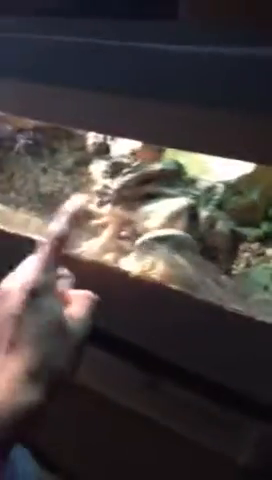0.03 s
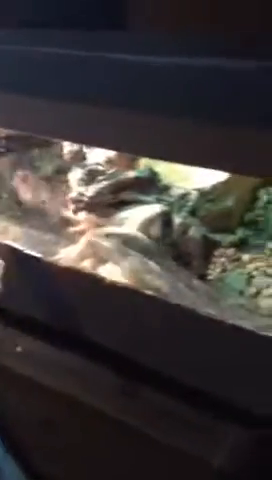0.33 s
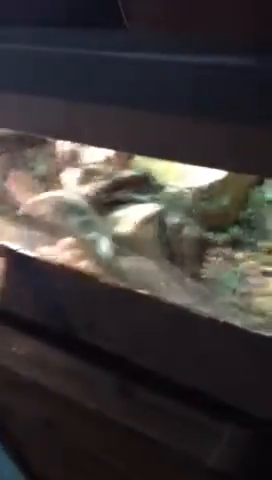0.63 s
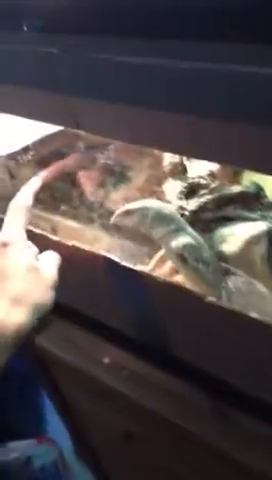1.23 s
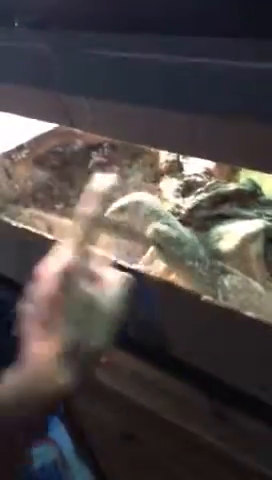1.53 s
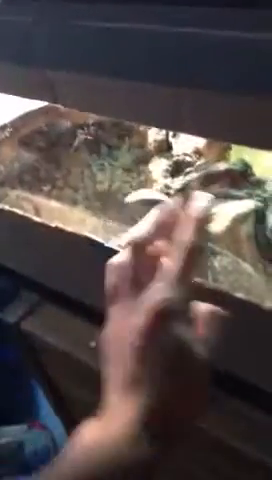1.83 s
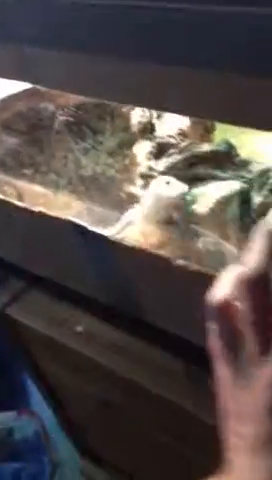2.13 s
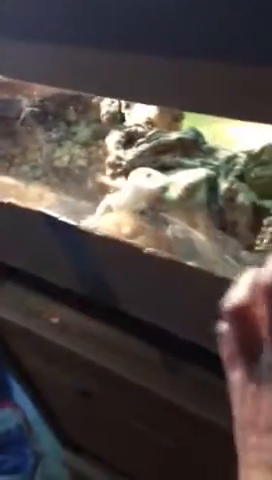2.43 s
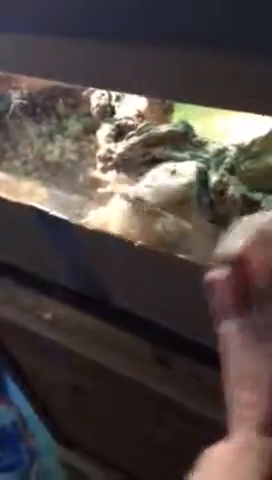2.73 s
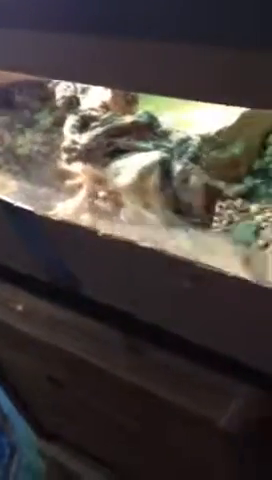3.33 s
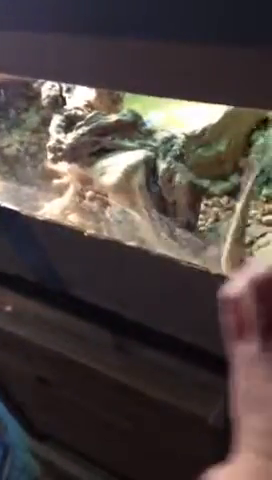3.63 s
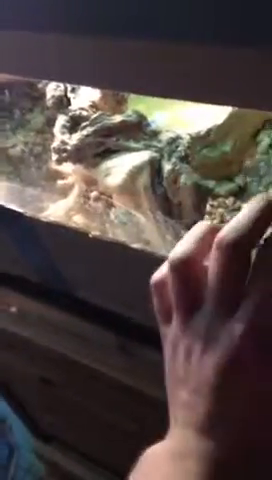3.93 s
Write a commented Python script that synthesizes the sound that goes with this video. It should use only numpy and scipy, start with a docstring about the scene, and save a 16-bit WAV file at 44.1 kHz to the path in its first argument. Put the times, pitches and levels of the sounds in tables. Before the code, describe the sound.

Taps and scratches on a lizard's glass tank, heard close in a quiet room. A fingernail clicks and the wooden cabinet bumps softly, claws scuff and squeak, then after a lull comes a quick flurry that thins out.

```python
"""A lizard's glass tank in a quiet room, one microphone close to the front pane.
Over faint hiss and hum, a first tap clicks on the glass and soft bumps make the wooden cabinet boom.
Fingernail and claws tick and scuff along the pane, squeaking where they stick and slip, with one
sharp tap at 1.6 s. After a lull, a flurry of taps, scratches and bumps starts near 3 s, is loudest
at 3.4 s and thins out to a last small tick."""
import sys
import numpy as np
from scipy import signal
from scipy.fft import rfft, irfft, next_fast_len
from scipy.io import wavfile
from scipy.ndimage import map_coordinates

SR = 44100
rng = np.random.default_rng(int(sys.argv[2]) if len(sys.argv) > 2 else 0)


def generate_wav(signal):
    """Clip the signal to [-1, 1] and save it as 16-bit WAV at the path in sys.argv[1]."""
    frames = np.transpose(np.atleast_2d(signal))
    scaled = np.clip(frames, -1, 1) * 32767
    pcm = np.round(scaled).astype(np.int16)
    wavfile.write(sys.argv[1], SR, pcm)


N = 4 * SR

# decay of the small room: frequency_hz, t60_s
ROOM_DECAY = [(150, 0.57), (1000, 0.25), (3500, 0.17), (8000, 0.25), (15000, 0.092)]
# spectrum of the room tone and hiss: frequency_hz, gain_db
ROOM_TONE_COLOUR = [(25, -22), (55, -23), (85, -21), (107, -9.5), (147, -3), (176, 1), (209, -7),
                    (245, -2.5), (310, -12.5), (440, -12), (760, -16), (1300, -19), (2300, -20.5),
                    (4500, -18.5), (5500, -21), (8400, -21), (10000, -29), (12000, -21.5), (15000, -21.5)]
# course of a soft rustle of movement: time_s, level_db
RUSTLE_LEVELS = [(0, -80), (.3, -70), (.55, -79.5), (.95, -72.5), (1.5, -77.5), (2.9, -75.5), (3.2, -65.5),
                 (3.45, -65), (3.6, -62.5), (3.8, -68), (4, -73.5)]
# spectrum of that rustle: frequency_hz, gain_db
RUSTLE_COLOUR = [(60, -42), (170, -2), (310, -2), (430, -1), (640, -4), (800, -6.5), (2000, -7.5),
                 (5000, -15.5), (12000, -21.5)]
# soft bumps on the cabinet: start_s, relative_level_db, pitch_hz
CABINET_BUMPS = [(0.127, -49, 235), (0.148, -46, 170), (0.194, -51.5, 176.5), (0.236, -51.5, 160),
                 (.29, -65.5, 190), (0.357, -58, 185.4), (0.618, -61, 165), (.935, -59.5, 228),
                 (1.352, -63, 194), (1.655, -54, 181.6), (1.848, -64.5, 162), (1.971, -61.5, 175),
                 (2.535, -59.5, 265), (2.543, -53.5, 158.4), (2.774, -58, 164), (2.812, -66, 158),
                 (3.039, -56, 149), (3.199, -54.5, 163), (3.305, -51.5, 165), (3.343, -53, 164),
                 (3.377, -44.5, 162), (3.41, -45.5, 162), (3.461, -51, 150.8), (3.588, -54, 157.6),
                 (3.643, -43, 161.5), (3.734, -66, 162), (3.849, -61, 165)]
# modes of the wooden cabinet: multiple_of_bump_pitch, gain_db, t60_s
CABINET_MODES = [(.8, -4.5, 0.035), (1, 6.5, 0.085), (1.45, -4.5, 0.083), (2.4, -22, 0.078)]
# dry scuffs of claws along the pane: start_s, length_s, level_db, treble_db
CLAW_SCUFFS = [(0.613, 0.039, -61, 0.5), (0.677, 0.088, -68.5, 10), (0.857, 0.043, -61.5, -6.5),
               (1.041, 0.03, -61, -0.5), (1.078, 0.063, -69, -6), (1.166, .045, -62, -10.5),
               (1.238, 0.044, -63, -10), (1.323, 0.034, -67.5, -4), (1.39, 0.042, -64, -9),
               (1.504, 0.032, -62, -1), (1.54, 0.026, -66.5, -6), (1.775, 0.037, -66.5, 10),
               (1.816, 0.021, -58, 0), (1.849, 0.025, -49, 4), (1.961, 0.014, -67, -17),
               (2.936, 0.023, -64.5, -6), (2.992, 0.11, -58.5, 8), (3.082, 0.076, -51.5, 12.5),
               (3.229, 0.18, -60, 11), (3.331, 0.033, -53.5, 15), (3.383, 0.03, -52.5, 3),
               (3.453, 0.049, -53, 6), (3.515, 0.13, -66.5, 13)]
# spectrum of a scuff: frequency_hz, gain_db
SCUFF_COLOUR = [(300, -44), (2050, -20), (2450, -12.5), (3100, -2.5), (3900, -8.5), (4500, -2.5),
                (5100, -14.5), (6800, -9.5), (8600, -13), (9800, -17.5), (15000, -27)]
# stick-slip squeaks: start_s, length_s, first_pitch_hz, last_pitch_hz, level_db, roughness_share
CLAW_SQUEAKS = [(.584, 0.0097, 6280, 5850, -51.5, 0.025), (0.585, 0.022, 7200, 6320, -56, 0.103),
                (0.616, 0.034, 2670, 2440, -56, 0.038), (0.661, 0.045, 2800, 3690, -57.5, 0.1),
                (0.693, 0.053, 3390, 3135, -57, 0.075), (1.849, 0.013, 5030, 4200, -50.5, 0.032),
                (1.856, 0.014, 3056, 2970, -52, 0.041), (1.928, 0.011, 2580, 2740, -55.5, 0.056),
                (2.162, 0.014, 6350, 7000, -66, 0.056), (2.969, 0.0083, 7180, 7000, -48, 0.017),
                (2.978, 0.0045, 7940, 8900, -45.5, 0.017), (2.99, 0.0098, 8750, 8660, -35.5, 0.0027),
                (3.012, 0.031, 10200, 10200, -55, 0.03), (3.031, 0.026, 10120, 8680, -47, 0.068),
                (3.08, 0.014, 14000, 11700, -51, 0.069), (3.088, 0.029, 8030, 4100, -43.5, 0.042),
                (3.118, 0.0165, 3820, 4350, -44, 0.045), (3.27, 0.014, 12700, 10800, -55.5, 0.05),
                (3.281, 0.0066, 8250, 7840, -52.5, .04), (3.307, 0.0053, 10060, 9700, -49.5, 0.026),
                (3.32, 0.011, 8660, 6460, -53, 0.065), (3.339, 0.026, 8960, 8200, -45, 0.04),
                (3.355, 0.02, 10300, 8800, -52, 0.08), (3.393, 0.0063, 5900, 5560, -42.5, 0.016),
                (3.606, 0.007, 10270, 10900, -51, 0.015)]
# hard contacts with the pane:
# start_s, relative_level_db, bass_db, mid_db, treble_db, chatter_t60_s, resonance_hz
PANE_TAPS = [(0.1256, -36.5, 10, 1, -1.5, .014, 2500), (0.2247, -62, -12, -4, 13.5, 0.015, 4680),
             (0.235, -62.5, 25, 7, 15, 0.024, 3300), (.301, -65, 11, 11, 6, 0.03, 3000),
             (0.717, -49.5, 13.5, -3, 0, 0.0083, 3030), (.931, -67, 24, 12, -4, 0.01, 500),
             (1.096, -52.5, -1, -11, -5, 0.0099, 3050), (1.117, -55.5, 12.5, -3, -8, 0.026, 3020),
             (1.511, -55.5, -13, -10, -3, 0.022, 4550), (1.6424, -30.5, -19.5, -8.5, -5, 0.033, 2650),
             (1.651, -46.5, 4, 11, 7, 0.039, 2560), (2.104, -61, 8, -4, 7.5, 0.023, 3000),
             (2.151, -60, 0, -8, 3, 0.022, 3900), (2.743, -55.5, 4, -8, 2.5, 0.016, 4500),
             (2.971, -42.5, -12, -13, 4, 0.02, 4450), (3.0245, -49, -22, -6, 4.5, 0.021, 3200),
             (3.2, -28.5, -12, 5, -14, 0.016, 2950), (3.2058, -39, -1, 2, -30, 0.044, 1440),
             (3.232, -58, -8, -6, 14, 0.033, 7800), (3.25, -52, -10, -12, 7, 0.03, 4500),
             (3.3389, -29.5, 1, 7, -20, 0.012, 1470), (3.367, -42, 9.5, 17, -10, 0.06, 1490),
             (3.3741, -46, -2, -6, 7, 0.0094, 3040), (3.382, -33.5, 11, 3.5, -6, 0.023, 4250),
             (3.388, -41, -11, 13, 16, 0.025, 7850), (3.409, -25.5, 0, 5, 6.5, 0.026, 3000),
             (3.4122, -28.5, 1.5, 4, 0, 0.012, 1017), (3.429, -51, -12, 4, 0, 0.045, 4300),
             (3.441, -46, 2, -3, -9, .02, 3130), (3.473, -63, -2, 13, 17, 0.028, 4000),
             (3.491, -53, -5, -7, 15, .025, 4500), (3.539, -60.5, 6, -6, 16.5, 0.03, 4600),
             (3.639, -48.5, -4, -21, -5, 0.059, 4530), (3.917, -59.5, 3, 8, -15, 0.013, 2400)]
# spectrum of a tap's click: frequency_hz, gain_db
CLICK_COLOUR = [(70, -47), (170, -12.5), (310, -19.5), (420, -3), (630, -10.5), (800, -8), (1000, -8),
                (1300, -6), (1800, -4), (2150, -6), (2500, 1), (2900, 0.5), (4500, -2), (5100, -11.5),
                (8000, -11), (11000, -20.5), (15000, -26)]
# modes of the glass pane: frequency_hz, gain_db, t60_s
PANE_MODES = [(754, -13, .22), (792, -12, .22), (1010, -8, .15), (1240, -12, .16), (1410, -11, .13),
              (1520, -9, .1), (2010, -9, .08), (2367, -4, .1), (2720, 0, .08), (2927, 3, .1), (3130, 0, .1),
              (3280, -1, .07), (3742, -3, .08), (4560, -2, .11)]

ROOM_TONE_DB, HUM_DB, RUSTLE_SWING_DB = -68.5, -78.5, 2.5
BOOM_HZ, BOOM_DB, BOOM_T60_S = 171, -20, 0.35  # the room's low resonance, woken by every bump
BUMP_ROOM_DB, SLIP_ROOM_DB, TAP_ROOM_DB = -11.5, -7, -7  # reverberation against direct sound
BUMP_GAIN_DB, BUMP_RISE_S = 26, 0.01
GRAINS_PER_S = 3500
JITTER_PER_S, GRIP_PER_S, GRIP_DB_PER_ROUGHNESS = 1000, 900, 60
OVERTONE_DB, SKID_PER_ROUGHNESS, SKID_HALF_WIDTH_HZ = -9.5, 11.25, 489
TAP_GAIN_DB, CONTACT_S = 19, 0.0019
SNAP_DB, SNAP_T60_S = -6, 0.019  # the snap's gain at this chatter t60; longer chatter softens it
SPOT_DB, SPOT_WIDTH = 8, 0.03  # each spot favours one resonance: boost, width as a share of its pitch
RING_DB, FULL_RING_DB, MODE_SCATTER_DB = -7, -26, 4  # blows below FULL_RING_DB ring the pane less
BASS_HZ, MID_HZ, TREBLE_HZ, TOP_HZ = 700, 2300, 4900, 15500


def amp(db):
    """Decibels to gain."""
    return 10 ** (np.asarray(db) / 20)


def unit_rms(x):
    """Scaled to rms 1."""
    return x / np.sqrt(np.mean(x ** 2) + 1e-20)


def unit_energy(x):
    """Scaled to energy 1."""
    return x / np.sqrt(np.sum(x ** 2) + 1e-20)


def along(points, hz):
    """Reads (frequency_hz, value) points on a log frequency axis."""
    freqs, values = np.transpose(points)
    return np.interp(np.log(hz + 1), np.log(freqs + 1), values)


def wobble(per_s, size):
    """A smooth random curve with per_s knots a second."""
    return map_coordinates(rng.standard_normal(size + 4), [np.arange(size) * per_s / SR])


def add(track, start_s, x):
    """Mixes x in from start_s."""
    i = round(start_s * SR)
    track[i:i + len(x)] += x[:max(len(track) - i, 0)]


def coloured(x, gain_db):
    """x through a minimum-phase filter; gain_db is a function of Hz."""
    size = 2 * next_fast_len(len(x))
    cepstrum = irfft(np.log(amp(gain_db(np.fft.rfftfreq(size, 1 / SR)))), size)
    cepstrum[1:size // 2] *= 2
    cepstrum[size // 2 + 1:] = 0
    return irfft(rfft(x, size) * np.exp(rfft(cepstrum)), size)[:len(x)]


def shelves(x, bass_db, mid_db, treble_db):
    """Three tone bands, each with its own gain: bass, mid and treble."""
    def gain_db(f):
        bass, bass_and_mid, under_treble = (1 / (1 + (f / hz) ** 6) for hz in (BASS_HZ, MID_HZ, TREBLE_HZ))
        return bass_db * bass + mid_db * (bass_and_mid - bass) + treble_db * (1 - under_treble)
    return coloured(x, gain_db)


def stroke(t, length, rise, fall):
    """Envelope of a claw stroke; rise and fall are shares of the length."""
    return np.clip(t / (rise * length), 0, 1) * np.clip((1 + fall / 2 - t / length) / fall, 0, 1)


def in_room(x, wet_db):
    """The direct sound plus the tail of a small room whose bass lingers longest."""
    hz, t, spectra = signal.stft(rng.standard_normal(SR // 2), SR, nperseg=256)
    tail = signal.istft(spectra * amp(-60 * t / along(ROOM_DECAY, hz)[:, None]), SR, nperseg=256)[1]
    build_up = np.minimum(np.arange(len(tail)) / SR / 0.0047, 1)
    response = amp(wet_db) * unit_energy(tail * build_up)
    response[0] += 1
    return signal.fftconvolve(x, response)


def background():
    """Room tone, hiss, a faint wavering hum and a soft rustle of movement."""
    t = np.arange(N) / SR
    air = unit_rms(coloured(rng.standard_normal(N), lambda f: along(ROOM_TONE_COLOUR, f)))
    hum = unit_rms(np.sin(2 * np.pi * BOOM_HZ * t + wobble(5.3, N)) * amp(3.6 * wobble(10, N)))
    rustle = unit_rms(coloured(rng.standard_normal(N), lambda f: along(RUSTLE_COLOUR, f)))
    rustle_db = np.interp(t, *np.transpose(RUSTLE_LEVELS)) + RUSTLE_SWING_DB * wobble(45, N)
    return amp(ROOM_TONE_DB) * air + amp(HUM_DB) * hum + amp(rustle_db) * rustle


def cabinet_bumps():
    """A soft push swells into a few cycles of the cabinet's low modes and leaves a faint room boom."""
    out, t = np.zeros(N), np.arange(SR // 2) / SR
    swell = 1 - np.exp(-(t / BUMP_RISE_S) ** 2)
    for start_s, level_db, pitch_hz in CABINET_BUMPS:
        modes = [(multiple * pitch_hz, db, t60) for multiple, db, t60 in CABINET_MODES]
        modes.append((BOOM_HZ, BOOM_DB, BOOM_T60_S))
        boom = sum(amp(db - 60 * t / t60) * np.sin(2 * np.pi * hz * t) for hz, db, t60 in modes)
        bump = amp(level_db + BUMP_GAIN_DB) * unit_energy(boom * swell)
        add(out, start_s, in_room(bump, BUMP_ROOM_DB))
    return out


def claw_scuffs():
    """Tiny uneven catches of a claw excite the pane's upper resonances."""
    out, t = np.zeros(N), np.arange(SR // 4) / SR
    for start_s, length_s, level_db, treble_db in CLAW_SCUFFS:
        catches = rng.uniform(-1, 1, len(t)) * (rng.random(len(t)) < GRAINS_PER_S / SR)
        flicker = amp(4 * np.tanh(wobble(230, len(t))))
        rasp = coloured(catches * flicker, lambda f: along(SCUFF_COLOUR, f))
        rasp = unit_rms(shelves(rasp, 0, 0, treble_db))
        scuff = amp(level_db) * rasp * stroke(t, length_s, rise=0.18, fall=0.95)
        add(out, start_s, in_room(scuff, SLIP_ROOM_DB))
    return out


def claw_squeaks():
    """A claw sticks and slips at a gliding, uneven rate; rough strokes also skid."""
    out, t = np.zeros(N), np.arange(SR // 10) / SR
    for start_s, length_s, first_hz, last_hz, level_db, roughness in CLAW_SQUEAKS:
        glide_hz = np.interp(t, [0, length_s], [first_hz, last_hz])
        hz = glide_hz * (1 + roughness * wobble(JITTER_PER_S, len(t)))
        phase = 2 * np.pi * np.cumsum(hz) / SR
        tone = np.sin(phase) + amp(OVERTONE_DB) * np.sin(2 * phase) * (2 * hz < TOP_HZ)
        # a band of noise around the pitch
        skid = sum(wave(phase) * wobble(2 * SKID_HALF_WIDTH_HZ, len(t)) for wave in (np.sin, np.cos))
        grip = amp(GRIP_DB_PER_ROUGHNESS * roughness * np.tanh(wobble(GRIP_PER_S, len(t))))
        voice = unit_rms((tone + SKID_PER_ROUGHNESS * roughness * skid) * grip)
        squeak = amp(level_db) * voice * stroke(t, length_s, rise=0.25, fall=0.93)
        add(out, start_s, in_room(squeak, SLIP_ROOM_DB))
    return out


def contact_click(chatter_t60_s, resonance_hz):
    """Nail or claw lands with a snap and a brief chatter, coloured by the spot it hits."""
    def colour_db(f):
        return along(CLICK_COLOUR, f) + SPOT_DB * np.exp(-((f / resonance_hz - 1) / SPOT_WIDTH) ** 2)
    t = np.arange(SR // 4) / SR
    decay = amp(-60 * np.maximum(t - CONTACT_S, 0) / chatter_t60_s)
    blow = unit_energy(rng.standard_normal(len(t)) * decay)
    blow[0] += amp(SNAP_DB) * (SNAP_T60_S / chatter_t60_s) ** 2
    return unit_energy(coloured(blow, colour_db))


def pane_ring():
    """The glass rings briefly, each mode at a scattered strength and a random phase."""
    t = np.arange(SR // 4) / SR
    ring = np.zeros(len(t))
    for hz, db, t60 in PANE_MODES:
        decay = amp(db + rng.normal(0, MODE_SCATTER_DB) - 60 * t / t60)
        ring += decay * np.sin(2 * np.pi * (hz * t + rng.random()))
    return unit_energy(ring)


def pane_taps():
    """Each tap clicks and sets the pane ringing; light ones barely do."""
    out = np.zeros(N)
    for start_s, level_db, bass_db, mid_db, treble_db, chatter_t60_s, resonance_hz in PANE_TAPS:
        ring_db = RING_DB + np.clip(level_db + mid_db - FULL_RING_DB, -10, 0)
        strike = contact_click(chatter_t60_s, resonance_hz) + amp(ring_db) * pane_ring()
        tap = amp(level_db + TAP_GAIN_DB) * shelves(strike, bass_db, mid_db, treble_db)
        add(out, start_s, in_room(tap, TAP_ROOM_DB))
    return out


def scene():
    """Everything at one microphone close to the glass."""
    return (pane_taps() + claw_scuffs() + claw_squeaks() + cabinet_bumps() + background())[None]


def record(dry):
    """The recorder has a 70 Hz low cut and drops everything above its band limit."""
    size = next_fast_len(N + SR // 2)
    low_cut = signal.sosfilt(signal.butter(3, 70, 'high', fs=SR, output='sos'), dry)
    in_band = np.fft.rfftfreq(size, 1 / SR) < TOP_HZ
    return irfft(rfft(low_cut, size) * in_band, size)[..., :N]


dry = scene()
out = record(dry)
generate_wav(out)
```